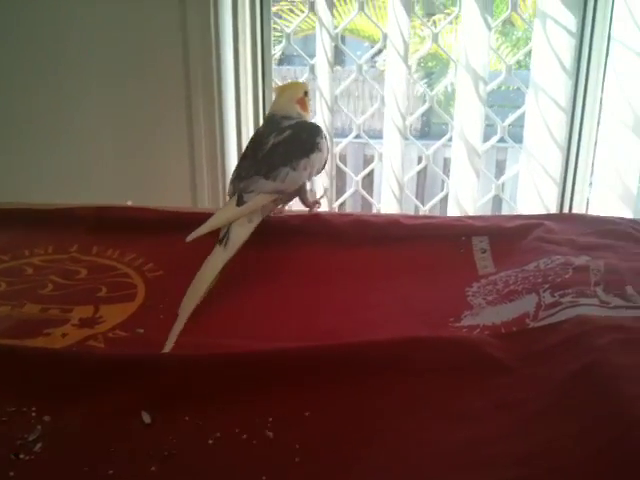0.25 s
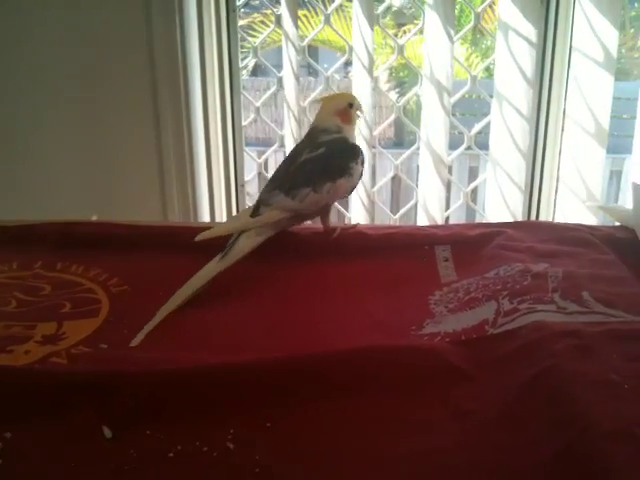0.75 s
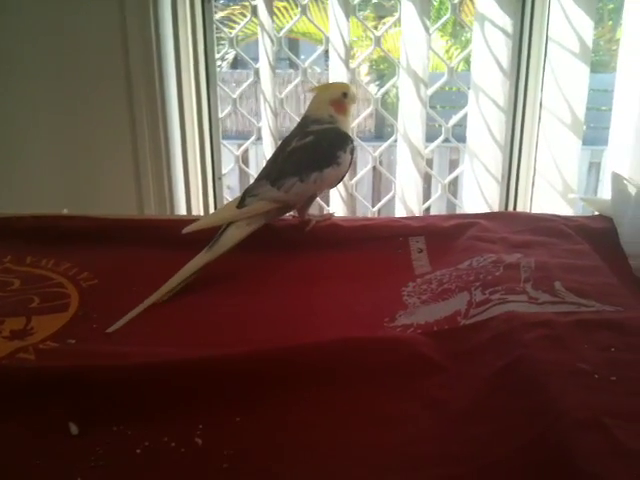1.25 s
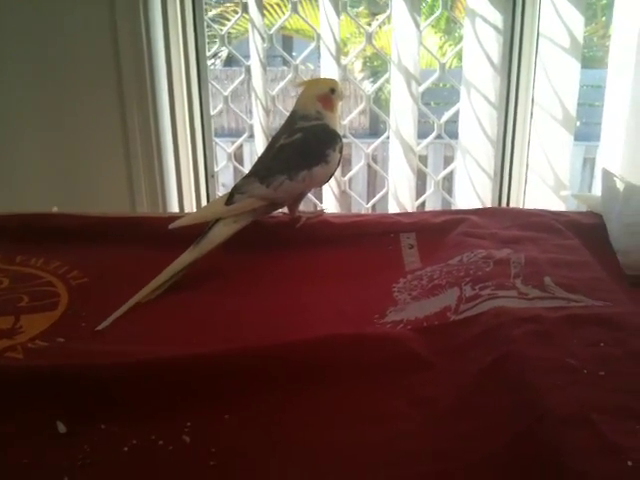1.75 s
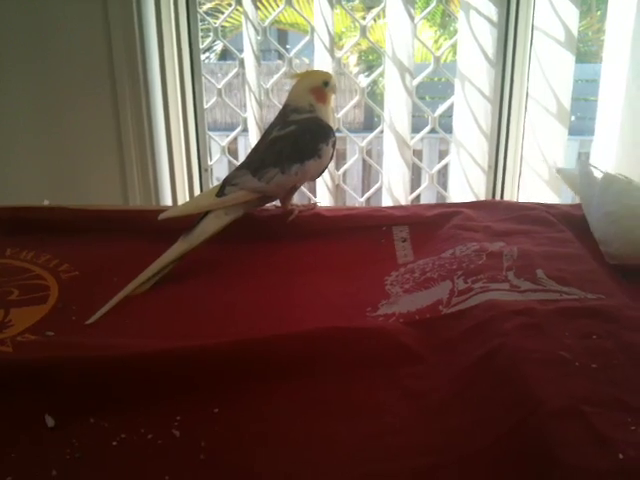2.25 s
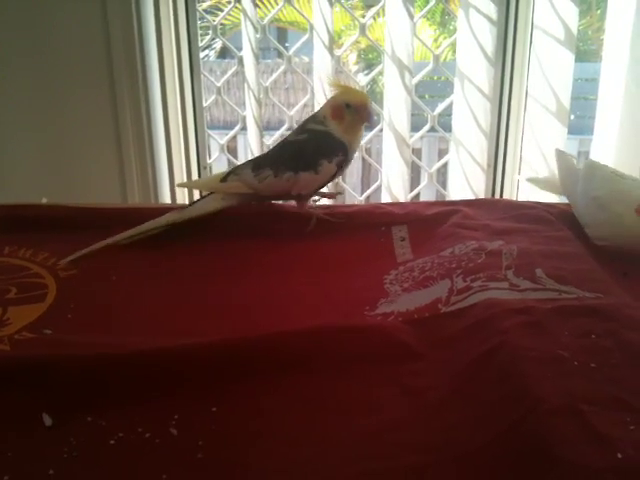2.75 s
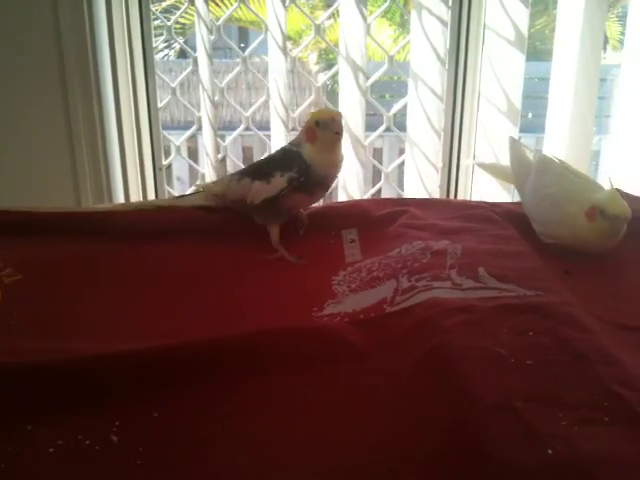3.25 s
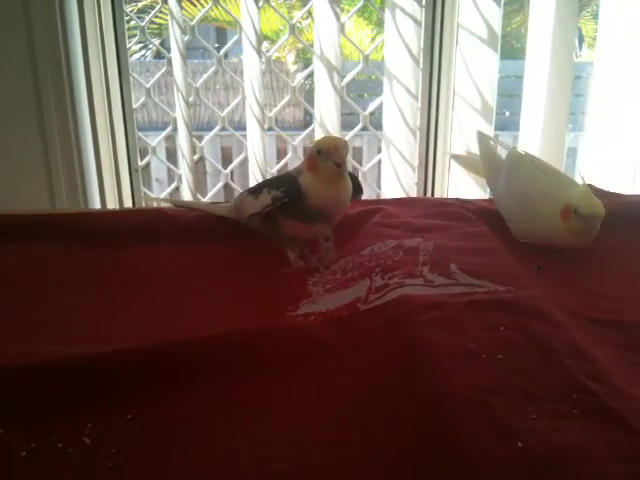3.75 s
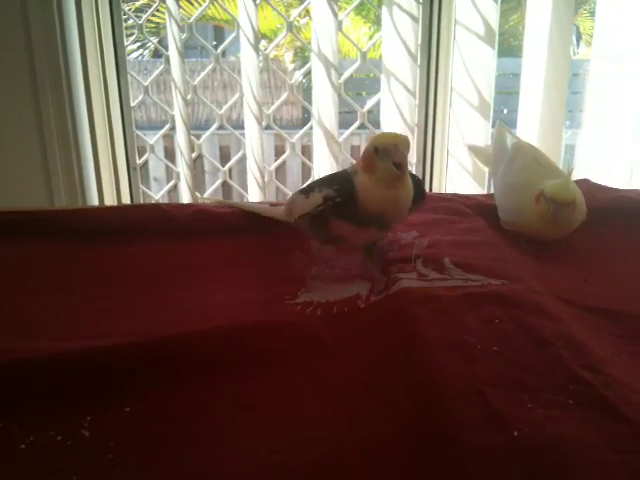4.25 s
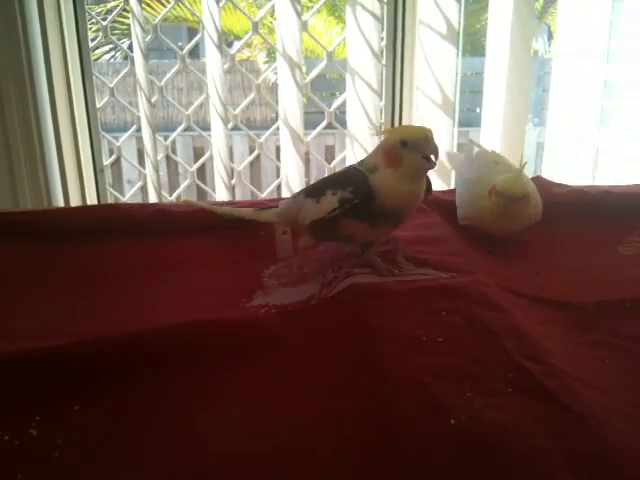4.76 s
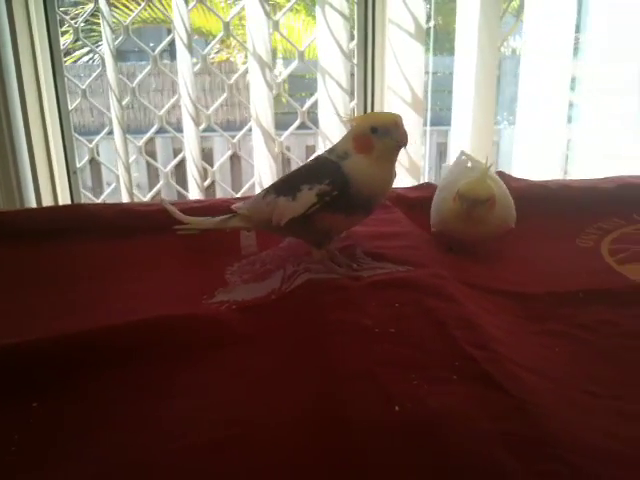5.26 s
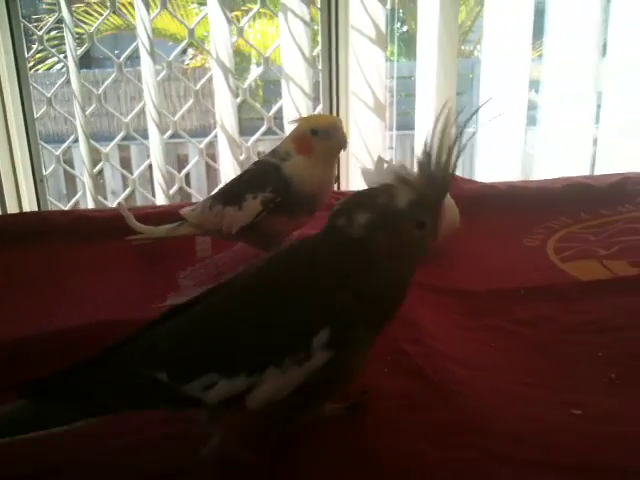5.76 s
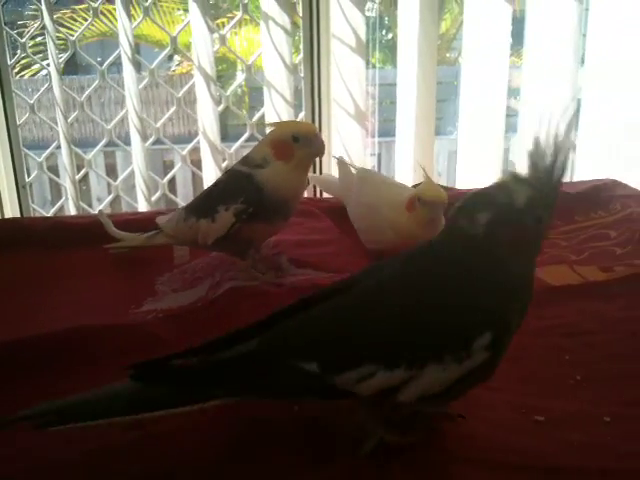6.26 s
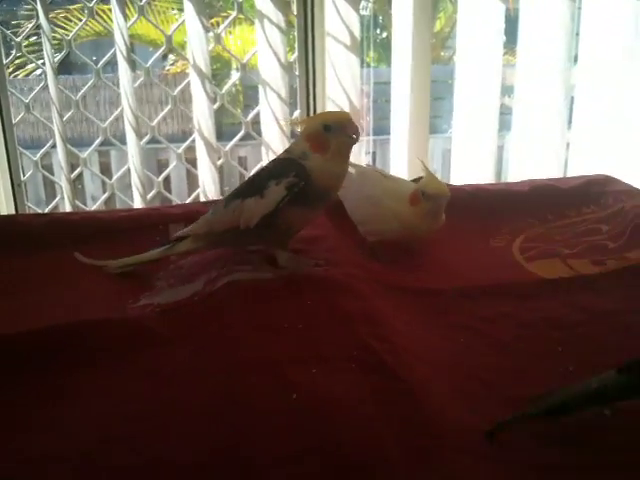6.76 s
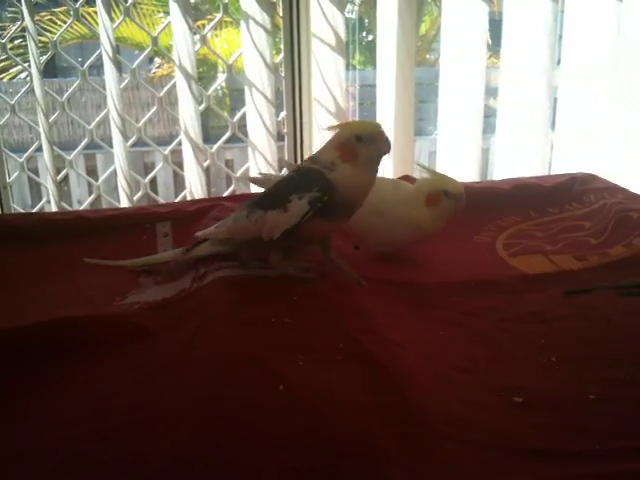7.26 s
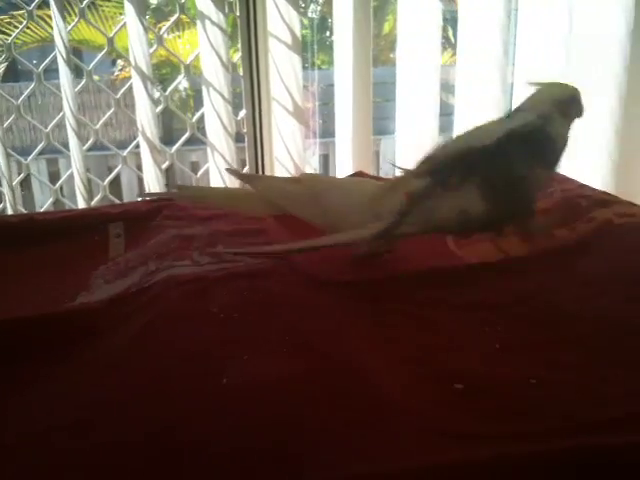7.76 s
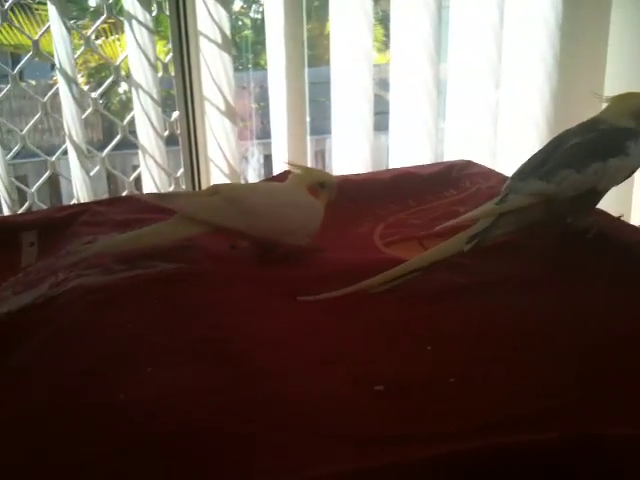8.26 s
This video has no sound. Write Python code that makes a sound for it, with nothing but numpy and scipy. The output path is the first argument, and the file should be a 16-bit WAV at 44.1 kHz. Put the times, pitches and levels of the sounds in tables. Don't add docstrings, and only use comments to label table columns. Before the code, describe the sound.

A hard, bright room with a quiet bed of dull house noise and faint hum. At 0 s a farther bird's nearly pure whistle, around 3.3 kHz, falls and vanishes within a tenth of a second, overlapping a near cockatiel's call already under way until 0.26. The near bird calls again at 0.37 and 0.85. Each call lasts about 0.35 s: a quick glide from 1.8 to 2.7 kHz, a short raspy crack, then a held, rapidly warbling note near 2.2 kHz, rich in bright harmonics. After echo and quiet from 1.2, five calls start at 2.98, 3.4, 3.85, 4.3 and 4.78. In the pause from 5.13, soft cloth brushes come near 5.1, 5.66 and 6.17, with tiny claw ticks at 5.8-6.55. Four more calls follow at 6.56, 7.0, 7.47 and 7.93, a dull brush under the last, which ends near 8.28.

```python
import sys
import numpy as np
from scipy import signal
from scipy.fft import rfft, irfft, next_fast_len
from scipy.io import wavfile
from scipy.ndimage import map_coordinates

SR = 44100
rng = np.random.default_rng(int(sys.argv[2]) if len(sys.argv) > 2 else 0)


def undo_db(level):
    steps = np.asarray(level, float) / 20
    return 10 ** steps


def pcm_store(signal):
    levels = np.round(np.clip(np.atleast_2d(signal), -1, 1) * 32767)
    wavfile.write(sys.argv[1], SR, levels.astype(np.int16).T)


N = 374850
T = np.arange(N) / SR
LEAD = SR // 4
CALL_LENGTH = SR * 9 // 20

# pitch_hz, level_db (per Hz)
HOUSE_COLOUR = [(20, -50), (45, -33.5), (75, -21.5), (110, -13.5), (165, -3.5), (260, -9.5), (320, -6.5),
                (560, -10), (900, -14.5), (1500, -21), (2400, -26.5), (6000, -30.5), (15500, -32.5)]
# time_s, level_db
HOUSE_DRIFT = [(0, -.5), (2.2, -1.5), (5.8, 1), (8.5, .1)]
# pitch_hz, level_db
HUM_TONES = [(165, -84), (301.5, -77), (339.1, -81), (393.0, -84), (7483, -93)]
# pitch_hz, decay_s
ECHO_DECAY = [(1000, 0.47), (2000, 0.9), (4300, 0.67), (8000, 0.54), (14000, 0.15)]
# pitch_hz, level_db
ECHO_COLOUR = [(1500, 0), (3500, 1.5), (6000, -1.5), (9000, 3.5), (14000, 3.5)]
# start_s, peak_db, rise_s, fall_s, #
RUSTLES = [
    (5.657, -66.5, 0.0048, .05, 1),
    (6.172, -57, 0.0059, .06, -3.5),
    (6.151, -60, 0.044, .12, -6),
    (5.111, -54, .02, 0.033, -6),
    (7.91, -54, 0.019, .03, -5),
           (5.875, -69, .008, .035, -2), (5.79, -71, .004, .012, -2), (6.29, -72, .004, .015, 0),
              (6.34, -68, .008, .025, -1), (6.39, -72, .004, .012, 0), (6.507, -64, .0007, .003, 4),
              (6.531, -66, .001, .004, 0), (6.55, -70, .001, .004, 2)]
# time_s, pitch_hz, level_db
FAR_WHISTLE = [(-.14, 2916, -36), (-.07, 3565, -26), (0, 3360, -20), (.014, 3350, -10.5), (.021, 3330, -38),
               (.032, 3310, -23.5), (.05, 3174, -29), (.075, 2974, -39), (.09, 2900, -65.5)]
# pitch_hz, level_db
BEAK_COLOUR = [(6000, 5), (8500, -10), (9600, -18), (11000, 0), (12200, -21), (13200, -24), (14200, -31),
               (15200, -18), (17000, -58), (19000, -120)]
# pitch_hz, level_db
RASP_COLOUR = [(350, -22), (800, -10), (1300, -12.5), (2500, 3.5), (5000, -7), (8000, -15), (15000, -38.5)]
# time_from_break_s, depth_percent
BREAK_WARBLE = [(-.09, 0.074), (-.06, 1.4), (-.035, 3.9), (0, 3.3), (.02, 0.29)]
# break_s, rasp_peak_db, period_doubling_share, swell_and_warble_start_s,
# warble_depth_percent
BREAKS = [(.085, -54.5, 0.2, 0.16, 2.2), (.575, -47, 0, .66, 2.9), (1.063, -50, 0.04, 1.15, 4.2),
          (3.177, -50.5, 0.4, 3.265, 1.6), (3.597, -49, .7, 3.66, 3), (4.05, -46.5, .2, 4.1, 2),
          (4.49, -47, .25, 4.59, 2), (4.975, -50, 0.24, 5.05, 3.8), (6.751, -50, 0, 6.81, 1.6),
          (7.195, -50.5, 0.17, 7.285, 2.6), (7.68, -50.5, 0.1, 7.735, 2.25), (8.129, -49, .1, 8.2, 3.8)]
# stage (0 start, 1 top), climb_share, partial_1_db, partial_2_db, partial_3_db,
# partial_5_db
RISE = [(0, 0, -49, -59, -52, -80), (.18, .05, -40, -37, -38, -57), (.32, .29, -34.5, -22, -41, -44),
        (.44, .46, -31, -19.5, -37, -37), (.7, .83, -31.5, -22.5, -41, -51), (.88, .97, -33, -25, -43, -58),
        (1, 1, -29, -28, -48, -61)]
# stage (2 break, 3 swell, 4 end), height_share (0 held pitch, 1 top), partial_1_db,
# partial_2_db, partial_3_db, partial_5_db
HELD_NOTE = [(1.25, .7, -31, -32, -41, -60), (1.65, .13, -32, -37.5, -36, -47),
             (2, -.03, -33, -43, -38, -48), (2.5, .06, -29, -35.5, -32, -43),
             (3, .03, -27.5, -27.5, -32, -46), (3.45, .01, -27.5, -36.5, -46, -61),
             (4, .01, -30, -46, -55, -69)]
# start_s, climb_38_percent_s, climb_82_percent_s, top_s, end_s
CALL_TIMES = [(-.125, -.057, .001, .043, .259), (.365, .431, .476, .527, .729),
              (.848, .904, .947, 1.028, 1.209), (2.982, 3.04, 3.095, 3.123, 3.314),
              (3.405, 3.455, 3.502, 3.556, 3.739), (3.855, 3.912, 3.961, 4.006, 4.184),
              (4.297, 4.355, 4.405, 4.455, 4.659), (4.775, 4.843, 4.891, 4.927, 5.129),
              (6.562, 6.613, 6.658, 6.696, 6.889), (6.998, 7.058, 7.119, 7.146, 7.364),
              (7.47, 7.528, 7.587, 7.633, 7.819), (7.93, 7.987, 8.033, 8.083, 8.284)]
# start_hz, top_hz, held_hz, sag_after_swell_hz, end_over_held_hz
CALL_PITCH = [(1780, 2730, 2195, 40, -30), (1810, 2700, 2145, 15, -20), (1785, 2650, 2165, 60, -10),
              (1800, 2770, 2225, 110, -10), (1770, 2620, 2250, 105, -50), (1740, 2690, 2185, 70, -15),
              (1710, 2650, 2165, 95, 75), (1765, 2670, 2150, 120, -30), (1790, 2720, 2200, 5, 110),
              (1770, 2775, 2195, 90, 75), (1800, 2710, 2240, 150, -40), (1790, 2660, 2145, 115, 10)]
# rise_db, rise_brightness_db_per_octave, held_db, held_brightness_db_per_octave,
# push_into_end_db
CALL_EFFORT = [(.9, -2.5, -1.5, -1.2, -.5), (-1.8, -.5, -2.2, .5, -2.2), (-3, .3, -2.2, 1.1, 2.5),
               (1.8, -.5, .5, -1.2, -4.5), (.3, 1.1, -.5, 1.8, -1.8), (.3, .5, .8, -.2, 4),
               (1.5, 1.1, .5, 1.9, 3), (1.8, .4, -1.5, 2.8, .6), (2.5, -.6, 4, -2.2, 5),
               (-.5, 1.2, 1.2, 1.2, -1.8), (-.9, -.7, 1.8, -.8, -2.5), (1.5, -5.5, -4, .3, 3.5)]


def along(points, hz):
    f, v = np.transpose(points)
    return np.interp(np.log(hz + 1), np.log(f + 1), v)


def wobble(rate, count=N):
    knots = rng.standard_normal(int(count * rate / SR) + 4)
    return map_coordinates(knots, [np.arange(count) * rate / SR])


def noise(gain, count=N):
    spectrum = rfft(rng.standard_normal(count))
    x = irfft(spectrum * gain(np.fft.rfftfreq(count, 1 / SR)), count)
    return x / np.std(x)


def house():
    air_db = -65 + np.interp(T, *np.transpose(HOUSE_DRIFT)) + 0.27 * wobble(1.5) + .6 * wobble(8)
    sound = undo_db(air_db) * noise(lambda f: undo_db(along(HOUSE_COLOUR, f)))
    for hz, db in HUM_TONES:
        level_db = db + 4.5 - 6 * (hz > 5000) + 3 * wobble(1.8)
        sound += undo_db(level_db) * np.sin(2 * np.pi * hz * T + 0.73 * wobble(3.9))
    return sound


def room(x):
    hz, t, z = signal.stft(rng.standard_normal(SR), SR, nperseg=256)
    fade_db = along(ECHO_COLOUR, hz)[:, None] - 60 * t / along(ECHO_DECAY, hz)[:, None]
    tail = signal.istft(z * undo_db(fade_db), SR, nperseg=256)[1]
    tail = tail * (1 + 3.1 * np.exp(-np.arange(len(tail)) / (0.0067 * SR)))
    delayed = np.pad(x, (150, 0))
    return signal.fftconvolve(delayed, tail / np.linalg.norm(tail))[:len(x)]


def rustles():
    x = np.zeros(N)
    t = np.arange(-SR // 4, SR // 2) / SR
    for start_s, db, rise, fall, tilt in RUSTLES:

        def colour(f):
            tilted = undo_db(tilt * np.log2(f / 4000 + 0.13))
            return tilted / (1 + (500 / (f + 1)) ** 2) / (1 + (f / 11000) ** 4)

        shape = np.exp(np.where(t < 0, t / rise, -t / fall))
        grain = undo_db(1.6 * wobble(200, count=len(t)))
        puff = noise(colour, count=len(t)) * grain
        part = x[round(start_s * SR) - SR // 4:][:len(t)]
        part += (undo_db(db) * shape * puff)[:len(part)]
    return x


def far_bird():
    s, hz, db = np.transpose(FAR_WHISTLE)
    t = (np.arange(N + LEAD) - LEAD) / SR
    pitch = np.interp(t, s, hz) * (1 + .035 * wobble(150, count=len(t)))
    phase = 2 * np.pi * np.cumsum(pitch) / SR
    level = undo_db(np.interp(t, s, db, left=-120, right=-120))
    return level * (np.sin(phase) + .05 * np.sin(2 * phase))


def gesture(times, pitch, effort, snap, swell):
    start_hz, top_hz, held_hz, sag_hz, hook_hz = pitch
    rise_db, rise_tilt, held_db, held_tilt, last_db = effort
    t = times[0] + np.arange(CALL_LENGTH) / SR
    stage = np.interp(t, [*times[:4], snap, swell, times[4]], [0, .38, .7, 1, 2, 3, 4])
    stages, *columns = np.transpose(RISE + HELD_NOTE)
    height, *levels = (np.interp(stage, stages, c) for c in columns)
    low = np.where(stage < 1, start_hz, held_hz)
    sag = np.interp(stage, [2.65, 3.35, 4], [0, -sag_hz, hook_hz])
    hz = low + height * (top_hz - low) + sag
    held = np.clip(stage - 1, 0, 1)
    last = np.clip(stage - 3, 0, 1)

    def push(k):
        rise_push = (1 - held) * (rise_db + rise_tilt * np.log2(k))
        return rise_push + held * (held_db + held_tilt * np.log2(k)) + last * last_db

    return t, times[4], hz, *(db + push(k) for db, k in zip(levels, (1, 2, 3, 5)))


def call(shape, snap, rasp_db, doubling, waver, waver_depth):
    t, end, hz, db1, db2, db3, db5 = shape
    count = len(t)
    crack = np.exp(-((t - snap) / 0.018) ** 2)

    depth_percent = np.interp(t - snap, *np.transpose(BREAK_WARBLE))
    depth = (depth_percent + waver_depth * np.clip((t - waver) / .015, 0, 1)) / 100
    jitter_size = .004 + .012 * np.exp(-(t - t[0]) / .03) + .02 * crack
    jitter = jitter_size * wobble(220, count=count) + .006 * wobble(55, count=count)
    warble_hz = 66 + 5 * wobble(30, count=count)
    beat = 2 * np.pi * (np.cumsum(warble_hz) / SR + rng.random())
    phase = 2 * np.pi * np.cumsum(hz * (1 + depth * np.sin(beat) + jitter)) / SR

    effort = 0.43 * db2 + 0.52 * db5
    late = .5 * (db1 - effort) - .8
    swell = 0.24 * (db2 - db5) - 4
    gliding = np.clip((snap - t - .02) / .03, 0, 1)

    def upper(k):
        return effort + along(BEAK_COLOUR, k * hz)

    def veil(k):
        return 11 * gliding * np.clip((k * hz - 11800) / 1200, 0, 1)

    def flutter(k):
        return (.4 + .5 * k) * wobble(160, count=count) + 1.2 * wobble(50, count=count)

    levels = [db1, db2, db3, upper(4) + swell, db5, upper(6) - veil(6), upper(7) + late - 1.7 * veil(7)]
    tone = sum(undo_db(db + flutter(k)) * np.sin(k * phase) for k, db in enumerate(levels, 1))
    throb = undo_db(40 * depth * np.cos(beat))

    doubled = np.sin(phase / 2) + 1.5 * np.sin(3 * phase / 2) + 1.2 * np.sin(5 * phase / 2)
    hiss = noise(lambda f: undo_db(along(RASP_COLOUR, f)), count=next_fast_len(count))[:count]
    rasp = undo_db(rasp_db) * crack * (doubling * doubled * wobble(250, count=count) + 1.3 * hiss)
    edge = np.clip(np.minimum((t - t[0]) / .002, (end - t) / 0.015), 0, 1)
    return np.sqrt(2) * tone * throb * edge + rasp


def parrot():
    x = np.zeros(N + LEAD)
    for times, pitch, effort, voice in zip(CALL_TIMES, CALL_PITCH, CALL_EFFORT, BREAKS):
        shape = gesture(times, pitch, effort, voice[0], voice[3])
        c = call(shape, *voice)
        x[LEAD + round(times[0] * SR):][:len(c)] += c
    return x


def scene():
    near, far = parrot(), far_bird()
    echo = undo_db(-5.5) * room(near + .8 * far)
    birds = (near + far + echo)[LEAD:]
    return (birds + rustles() + house())[None]


def top_cut(x):
    return signal.sosfilt(signal.butter(12, 15750, fs=SR, output="sos"), x)


def record(dry):
    return top_cut(dry)


dry = scene()
out = record(dry)
pcm_store(out)
```